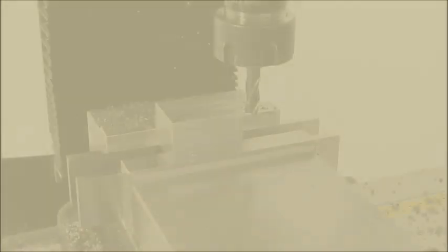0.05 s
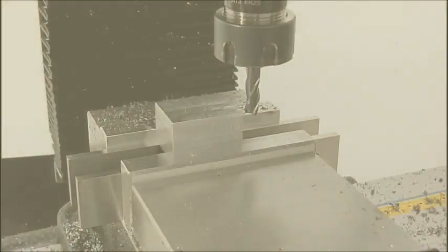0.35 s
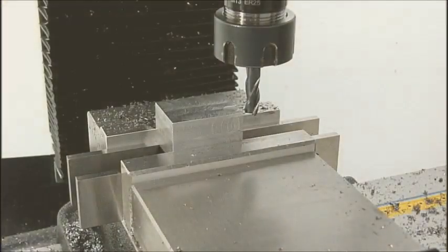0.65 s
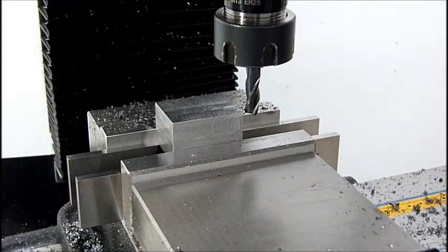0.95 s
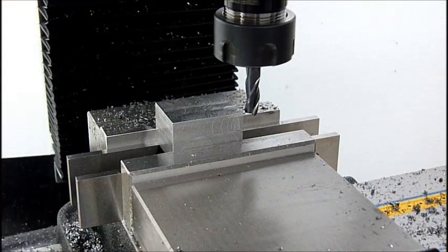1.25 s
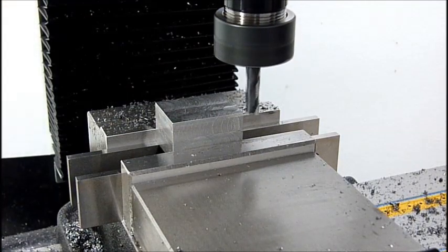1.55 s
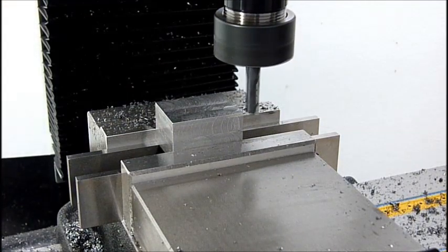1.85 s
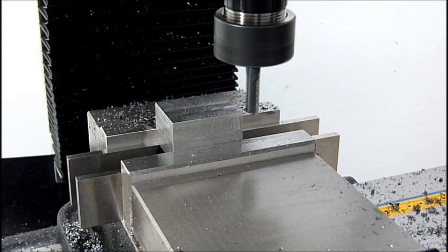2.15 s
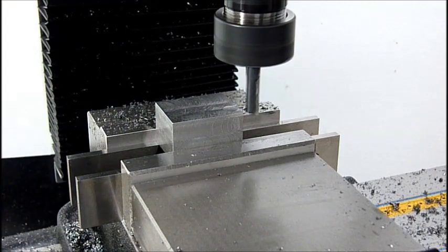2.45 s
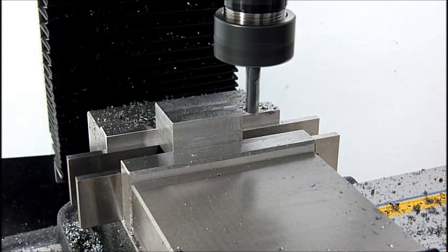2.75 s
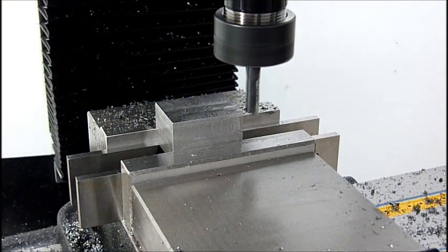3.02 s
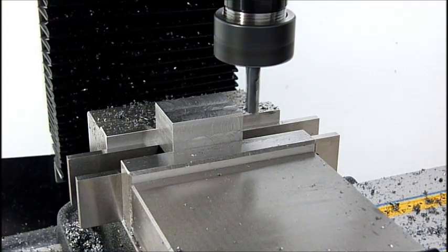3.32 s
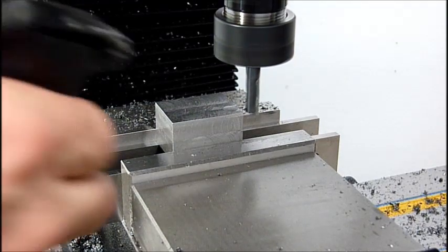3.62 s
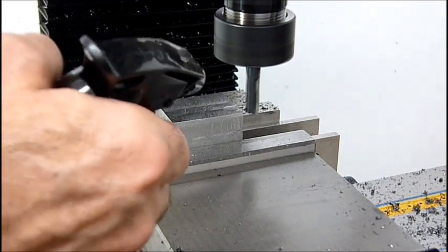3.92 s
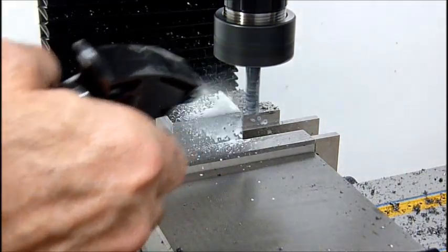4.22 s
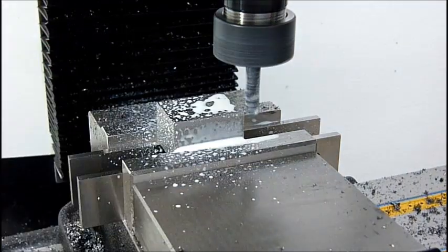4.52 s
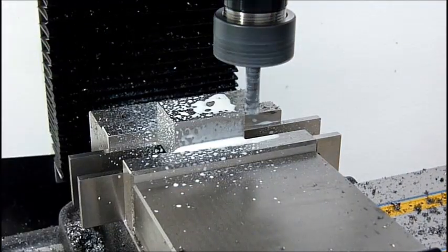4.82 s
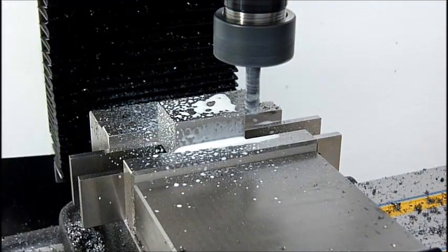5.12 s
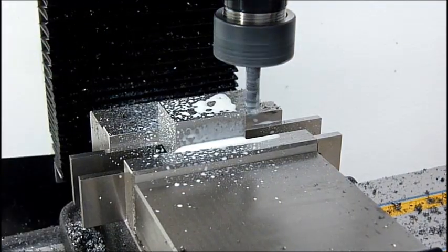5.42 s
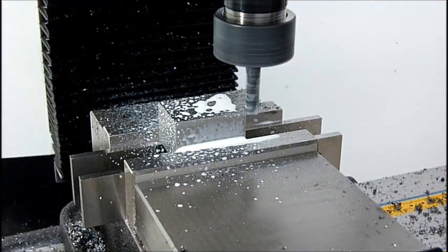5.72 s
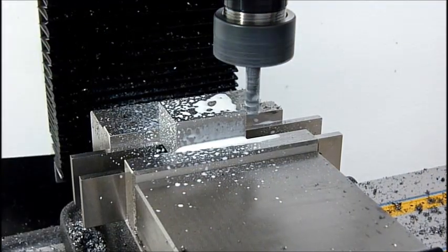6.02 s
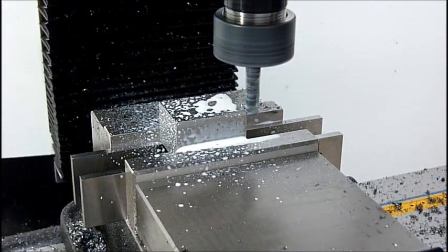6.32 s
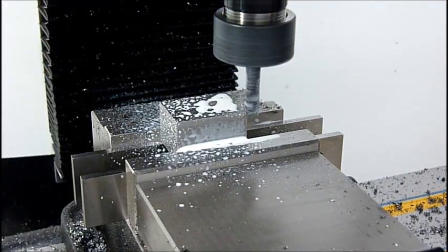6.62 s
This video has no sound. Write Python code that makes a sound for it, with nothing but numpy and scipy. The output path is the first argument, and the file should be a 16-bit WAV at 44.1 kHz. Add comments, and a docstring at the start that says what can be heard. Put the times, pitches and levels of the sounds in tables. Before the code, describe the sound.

In a workshop, a milling machine clunks on and speeds up with rattling, rising gear whine before droning and scraping through steel.

```python
"""The sound of a workshop fades in over a second: steady air noise and a few light clicks.
A milling machine starts with a clunk. As it speeds up, its gear teeth rattle, its head groans under
the strain and its gears whine higher and higher. Just before full speed the sound drops out briefly.
Then the spinning cutter bites into a steel block: the frame drones, the block grinds and the
cutting edges scrape off chips, one edge hardest on each turn."""
import sys
import numpy as np
from scipy import signal
from scipy.fft import rfft, irfft, next_fast_len
from scipy.io import wavfile
from scipy.ndimage import map_coordinates

SR = 44100
rng = np.random.default_rng(int(sys.argv[2]) if len(sys.argv) > 2 else 0)


def int16_out(signal):
    """Quantize to a 16-bit WAV file."""
    q = np.round(np.clip(np.atleast_2d(signal).T, -1, 1) * 32767)
    wavfile.write(sys.argv[1], SR, q.astype(np.int16))


N = 302967

# tone colour of the air noise: f/Hz, level/dB
AIR_COLOUR = [(24, -20), (40, -18), (108, -7.5), (141, -6), (205, -5.5), (244, -3.5), (371, -5), (822, -11),
              (898, -9.5), (980, -12), (7800, -27), (10100, -71.5), (17200, -120)]
# how long the room's echo takes to fall by 60 dB: f/Hz, t/s
ECHO_DECAY = [(200, 0.54), (700, 0.27), (2000, 0.2), (7000, 0.17)]
# light clicks: t/s, level/dB
TICKS = [(0.435, -33), (.439, -35), (0.534, -41.5), (1.0916, -23.5)]
# their tone colour: f/Hz, level/dB
TICK_COLOUR = [(300, -28.5), (900, -7), (1300, 5), (1900, 5), (2700, -8), (3500, -6), (4500, -25),
               (7500, -25)]
# blows of the starter switch: t/s, level/dB
STARTER_BLOWS = [(0.868, -6.5), (0.8742, -7.5), (.879, -1), (0.8837, 2.5), (.887, -4.5), (.894, -9.5)]
# their tone colour: f/Hz, level/dB
CLACK_COLOUR = [(100, -28.5), (230, -8.5), (300, -6.5), (520, 0.5), (850, -7.5), (1250, -8.5), (1600, -16),
                (2400, -23), (4000, -25), (6500, -27.5), (7800, -40.5)]
# ringing notes of the starter's cabinet: f/Hz, level/dB, time to fall by 60 dB/s
CABINET_NOTES = [(280, 0, 0.24), (484, 0, 0.14), (652, -16, 0.29), (734, -9, 0.25), (990, -2, .11),
                 (1300, -12, .12)]
# how fast the machine runs: t/s, share of full speed
SPEED = [(.9, .03), (1.3, .21), (1.65, 0.46), (2.0, 0.64), (2.2, 0.71), (2.65, 0.81), (3.09, .912),
         (3.18, .995), (5.37, 1), (6.87, 0.96)]
# tone colour of the gearbox housing: f/Hz, level/dB
HOUSING_COLOUR = [(60, -21), (150, -9.5), (280, 1), (600, -3), (1100, -0.5), (2000, -0.5), (3200, 1),
                  (4300, -10.5), (5800, -4.5), (7000, -8.5), (7800, -35)]
# its resonances, the pitches it likes to ring at: f/Hz, width/Hz, boost/dB
HOUSING_PEAKS = [(101, 14, 13), (289, 42, 11.5), (382.7, 52, 10), (497.3, 32, 13.5), (573.7, 69, 17),
                 (706.5, 59.4, 16.5), (796, 94, 8), (860, 77.5, 14), (927.6, 53, 11.5), (1055, 116, 11.5),
                 (1238, 113, 10), (1373, 80, 9.5), (1461, 34, 12), (1656, 91, 8.5), (1805, 186, 8.5),
                 (2017, 183, 11), (2360, 19, 5), (2643, 19, 7.5), (3840, 200, 6.5), (4360, 11, 12.5),
                 (4590, 25, 7.5), (4960, 190, 4.5)]
# tone colour of two loose gears: f/Hz, level/dB
GEAR_COLOUR = [(400, -67.5), (800, -23.0), (2100, -30), (3000, -61)]
# resonances of each of them: f/Hz, width/Hz, boost/dB
LARGE_GEAR_PEAKS = [(865, 44, 23), (912.3, 33, 24)]
SMALL_GEAR_PEAKS = [(2012, 130, 27.5)]
# their loudest bursts of chatter: t/s, large gear boost/dB, small gear boost/dB
CHATTER_BURSTS = [(2.425, 16.5, 11.5), (2.486, 11, 6), (2.72, 11, -2), (2.913, 2, 12), (3.257, 3, 14),
                  (3.395, -1, 11), (3.453, 5, 11), (3.698, 14, -16), (3.947, 12.5, -4), (4.017, 9, 6),
                  (4.124, 14, 8), (4.289, 0, 10), (4.853, 17.5, 5), (5.534, 13, 0)]
# tone colour of the groaning head: f/Hz, level/dB
GROAN_COLOUR = [(100, -38), (240, -15), (330, -1.0), (480, -18), (1000, -51)]
# gear and motor tones at full speed: f/Hz, level/dB, flutter/dB
GEAR_TONES = [(355, -62.5, 0.5), (416.7, -49, 1), (598.7, -43.5, 1.2), (697.4, -52.5, 1), (842, -49.5, 10),
              (908, -53, 7.5), (1386, -60, 0), (1690, -63, -5), (1592, -57.5, 2), (1988, -53, 7.5),
              (2230, -57, 6.5), (3157, -58.5, 6), (3770, -61.5, 4.5), (4400, -75.5, -0.5), (4620, -71.5, 1),
              (5140, -64, -0.5)]
# tones of the shaking frame: multiple of the cutter's turning rate, level/dB
DRONE_TONES = [(2, -56.5), (3, -40), (4, -46.5), (5, -43.5), (6, -56), (7, -49), (8, -49), (12, -49),
               (13, -60.5), (20, -60), (22, -50)]
# notes of the shuddering table and vise: f/Hz, level/dB
SHUDDER_NOTES = [(243, -41), (693.9, -54), (1452, -54.5)]
# the leading edge snags as it enters: t/s, boost/dB
SNAGS = [(5.521, 13.5), (5.653, 5), (5.675, 4.5)]
# tone colour of the scraping edges: f/Hz, level/dB
SCRAPE_COLOUR = [(500, -42), (2500, -24.5), (3800, -2.5), (4300, -15.5), (4500, -2), (4700, -3),
                 (5200, 0.5), (5600, -3.5), (6100, -3.5), (6400, -4.5), (6750, -9), (7100, -19.5),
                 (7800, -39.5)]
# resonances of the cutter: f/Hz, width/Hz, boost/dB
CUTTER_PEAKS = [(4490, 70, 5.5), (5130, 130, 3), (5900, 240, 4.5)]
# tone colour of block, vise and table: f/Hz, level/dB
BLOCK_COLOUR = [(60, -20.5), (130, -34), (165, -21), (250, 4.5), (330, -9.5), (600, -17), (1100, 1),
                (2200, -25.5), (3700, -25.5), (4300, -30), (7800, -51)]
# their resonances: f/Hz, width/Hz, boost/dB
BLOCK_PEAKS = [(196.5, 14, 13), (220, 18, -0.5), (379, 18, 8.5), (546, 190, 9.5), (669, 14, 19),
               (740, 15, -5.5), (810, 15, 1.5), (1073, 24, -1), (1460, 51, 12.5), (1690, 14, -1),
               (1803, 85, 15), (2000, 310, 4), (2434, 76, 13), (3053, 21, 18.5), (4000, 110, 10),
               (4523, 138, 4)]
# the block judders in the vise: t/s, boost/dB, half length/s
JUDDERS = [(6.14, 6, 0.016), (6.802, 4, 0.028)]

RATTLE_DB, RATTLE_GROWTH_DB = -35.5, 35  # base level; rise for ten times the speed
SINGS_FROM, SINGS_FULLY = 0.44, 0.6  # the whine fades in between these shares of full speed
WHINE_TORQUE_DB, WHINE_CUT_DB = 8, -5.5  # its change at full pull, and in the full cut
CONTACT_S, SEAT_S, WIDEN_S = 5.46, .09, 0.78  # first touch; time to settle in; time to full width
SPINDLE_HZ, FIRST_BITE_S = 45.43, 5.52  # cutter turns a second; the leading edge's first bite
DRONE_DB, GRIND_DB, SCRAPE_DB = -.3, -35, -44.5  # gains in the full cut
CLOG_TURNS, CLOG_S, CLOG_DB = 3, 6.422, 4.5  # extra thick chips: turns apart, time of one, boost
DROPOUT_START_S, DROPOUT_END_S = 3.087, 3.187


def amp(db):
    """Turn decibels into a number to multiply by."""
    return 10 ** (np.asarray(db) / 20)


def unit(x):
    """Scale x to an average power of 1."""
    return x / np.sqrt(np.mean(x ** 2) + 1e-20)


def along(points, hz):
    """Read between (f/Hz, value) points on a logarithmic pitch scale."""
    freqs, values = np.transpose(points)
    return np.interp(np.log(hz + 1), np.log(freqs + 1), values)


def clock():
    """The time of every sample, in seconds."""
    return np.arange(N) / SR


def wobble(rate):
    """A smooth random curve through `rate` new values a second."""
    return map_coordinates(rng.standard_normal(N // 40), [clock() * rate + 2], mode="wrap")


def bump(s, half_s):
    """A bell-shaped curve of height 1 around the time s."""
    return np.exp(-.5 * ((clock() - s) / half_s) ** 2)


def lift(peaks, hz):
    """The decibels that resonances (f/Hz, width/Hz, boost/dB) add at each frequency."""
    return sum(db / (1 + (2 * (hz - f) / width) ** 2) for f, width, db in peaks)


def body(x, colour, peaks=()):
    """Send x through an object that colours it and rings at its resonances."""
    size = 2 * next_fast_len(N // 2 + SR // 4)
    hz = np.fft.rfftfreq(size, 1 / SR)
    db = along(colour, hz) + lift(peaks, hz)
    # fold the filter so that ringing comes after each knock, never before
    cepstrum = irfft(np.log(amp(db)), size)
    cepstrum[1:size // 2] *= 2
    cepstrum[size // 2 + 1:] = 0
    return irfft(rfft(x, size) * np.exp(rfft(cepstrum)), size)[:N]


def impacts(rate, scatter_db):
    """Tiny knocks of random time and size, about `rate` a second."""
    hit = rng.random(N) < rate / SR
    return unit(hit * rng.choice([-1, 1], N) * amp(scatter_db * rng.standard_normal(N)))


def workshop():
    """Steady air noise, and a faint hum once the machine is switched on."""
    air = unit(body(rng.standard_normal(N), AIR_COLOUR))
    switched_on = np.interp(clock(), [.9, 1.5], [0, 1])
    hum = np.sin(2 * np.pi * 199.2 * clock() + 0.39 * wobble(6.5)) * switched_on
    return amp(-52) * air + amp(-56.5) * hum


def ticks():
    """Light clicks around the machine, each a soft touch and a quick, harder rebound."""
    out = np.zeros(N)
    for s, db in TICKS:
        contact = np.zeros(N)
        contact[round(s * SR)] = amp(-10.5)
        contact[round((s + .0013) * SR)] = 1
        click = body(contact, TICK_COLOUR, peaks=[(1800, 570, 2)])
        out += amp(db + 1) * click / np.abs(click).max()
    return out + amp(-9) * echo(out)


def echo(x):
    """The workshop's echo: high sounds die away first."""
    hz, t, spectrum = signal.stft(rng.standard_normal(SR // 2), SR, nperseg=256)
    decay = amp(-60 * t / along(ECHO_DECAY, hz)[:, None])
    tail = signal.istft(spectrum * decay, SR, nperseg=256)[1]
    return signal.fftconvolve(x, tail / np.linalg.norm(tail))[:N]


def starter():
    """The starter switch slams shut in a few quick blows and makes its cabinet ring."""
    blows, t = np.zeros(N), np.arange(SR // 2) / SR
    for s, db in STARTER_BLOWS:
        blows[round(s * SR)] = amp(db)
    ring = sum(amp(db - 60 * t / decay_s) * np.sin(2 * np.pi * hz * t + rng.uniform(0, 2 * np.pi))
               for hz, db, decay_s in CABINET_NOTES)
    # every blow jangles for a few milliseconds
    jangle = signal.fftconvolve(blows, amp(-60 * t / .012))[:N] * rng.standard_normal(N)
    clack = amp(-50) * unit(body(jangle, CLACK_COLOUR))
    return clack + amp(-3) * echo(clack) + amp(-31.5) * signal.fftconvolve(blows, ring)[:N]


def torque(speed):
    """The motor's pull: hardest from rest, easing to a small idle pull at full speed."""
    return np.clip(1 - speed, 0, 1) + 0.016


def gearbox(speed):
    """Gear teeth knock across the gaps between them, more often with speed, and ring the housing."""
    level_db = RATTLE_DB + RATTLE_GROWTH_DB * np.log10(speed)
    knocks = impacts(900 * speed, scatter_db=2.5) + amp(6.5) * rng.standard_normal(N)
    rattle = amp(-0.5) * unit(body(knocks, HOUSING_COLOUR, HOUSING_PEAKS))
    return (rattle + chatter(speed)) * amp(level_db + .5 * wobble(22))


def groan(speed):
    """The motor's pull makes the machine's head ring low; it swells with speed, then eases off."""
    ring = unit(body(rng.standard_normal(N), GROAN_COLOUR, peaks=[(290.6, 26, 15)]))
    return amp(-25.5) * torque(speed) * speed ** 2.9 * ring


def chatter(speed):
    """Two loose gears chatter in bursts once fast enough, the large one more when the motor pulls."""
    burst_db = sum(np.outer([large_db, small_db], bump(s, 0.011))
                   for s, large_db, small_db in CHATTER_BURSTS)
    gears = []
    for peaks, db in zip([LARGE_GEAR_PEAKS, SMALL_GEAR_PEAKS], burst_db):
        ring = unit(body(rng.standard_normal(N), GEAR_COLOUR, peaks))
        gears.append(ring * amp(db + 3.5 * np.clip(wobble(45), -2, 1.2)))
    large, small = gears
    fast_enough = np.interp(speed, [.3, .58], [0, 1])
    return (amp(-11.5 + 11.5 * torque(speed)) * large + amp(-13) * small) * fast_enough


def whine(speed):
    """Meshing teeth sing tones that rise with speed and swell at the housing's resonances."""
    pull = torque(speed)
    level_db = WHINE_TORQUE_DB * pull + WHINE_CUT_DB * engagement(WIDEN_S)
    grid_hz = np.arange(SR // 4)
    housing_db = lift(HOUSING_PEAKS, grid_hz)
    out = np.zeros(N)
    for hz, db, flutter_db in GEAR_TONES:
        swell_db = np.interp(hz * speed, grid_hz, housing_db) - np.interp(hz, grid_hz, housing_db)
        slow_db = -45 * (1 - speed) * np.abs(np.log2(hz / 520))  # only the main tones sing when slow
        waver = (0.18 * flutter_db + 2.5 * pull) * wobble(16)
        phase = 2 * np.pi * hz * np.cumsum(speed) / SR + waver
        depth_db = flutter_db + 28 * np.clip(1 - speed, 0, .12)  # rougher below full speed
        flutter = amp(depth_db * np.clip(wobble(14), -2, 1.5))
        out += amp(db + 0.75 * swell_db + slow_db) * unit(flutter * np.sin(phase))
    return amp(level_db) * np.interp(speed, [SINGS_FROM, SINGS_FULLY], [0, 1]) * out


def engagement(rise_s):
    """How far the cutter is in: 0 until it touches the block, 1 from rise_s later."""
    return np.clip((clock() - CONTACT_S) / rise_s, 0, 1)


def frame_drone(turns):
    """The cut shakes the frame in step with the turns; table and vise shudder at their own notes."""
    out = np.zeros(N)
    for multiple, db in DRONE_TONES:
        phase = 2 * np.pi * (multiple * turns + rng.random()) + 0.064 * multiple * wobble(12)
        out += amp(db + 2 * wobble(5.2)) * np.sin(phase)
    for hz, db in SHUDDER_NOTES:
        out += amp(db + 3 * wobble(15)) * np.sin(2 * np.pi * hz * clock() + .5 * wobble(8.9))
    return np.sqrt(2) * out


def leading_bite(turns, width):
    """The cutter runs off-centre, so one edge takes the thickest chip, a bit different each turn."""
    clogged = np.round((clock() - CLOG_S) * SPINDLE_HZ) % CLOG_TURNS == 0
    snag_db = sum(db * bump(s, .5 / SPINDLE_HZ) for s, db in SNAGS) + CLOG_DB * width * clogged
    thickness = amp(snag_db + 1.5 * np.clip(wobble(SPINDLE_HZ), -2, 2))
    turns_from_bite = (turns + 0.034 * wobble(SPINDLE_HZ) + .5) % 1 - .5
    return thickness * np.exp(-.5 * (turns_from_bite / 0.11) ** 2)


def cutter():
    """The cutting force repeats every turn: it shakes the frame, grinds steel and scrapes off chips."""
    width = engagement(WIDEN_S)
    turns = (clock() - FIRST_BITE_S) * SPINDLE_HZ
    drone = frame_drone(turns)
    bite = leading_bite(turns, width)
    other_edges = np.interp(width, [0, 1], [.15, .42])  # they join in as the cut widens
    force = (bite + other_edges) * amp(wobble(300))  # the chip tears off in jerks
    scrape = unit(body(force * impacts(6000, scatter_db=2), SCRAPE_COLOUR, CUTTER_PEAKS))
    pressure = (1 + 0.47 * bite) * amp(1.1 * wobble(25))
    grind = unit(body(pressure * impacts(2500, scatter_db=3.5), BLOCK_COLOUR, BLOCK_PEAKS))
    judder_db = sum(db * bump(s, half_s) for s, db, half_s in JUDDERS)
    return (amp(DRONE_DB) * engagement(SEAT_S) * drone
            + amp(GRIND_DB + judder_db) * width ** 0.76 * grind
            + amp(SCRAPE_DB) * width ** 0.57 * (scrape + amp(-5.5) * echo(scrape)))


def scene():
    """The machine in its workshop, heard from close to the vise."""
    speed = np.interp(clock(), *np.transpose(SPEED))
    machine = starter() + ticks() + gearbox(speed) + groan(speed) + whine(speed) + cutter()
    return (machine + workshop())[None]


def low_pass(x, hz):
    """Sharply cut away everything above hz."""
    return signal.sosfilt(signal.ellip(10, .1, 80, hz, fs=SR, output="sos"), x)


def record(dry):
    """The sound loses its top treble, fades in by steps, drops out briefly and later clicks faintly."""
    t = clock()
    offset = -.069  # a steady shift of the wave: it makes the dropout's edges click
    fade = np.minimum(np.round(t * 30) / 30, 1)  # 30 steps in the first second
    sound_on = (t < DROPOUT_START_S) | (t >= DROPOUT_END_S)
    click = amp(-34) * (np.arange(N) == round(4.4225 * SR))
    dulled = low_pass(dry, hz=7900)
    return low_pass((dulled + offset + click) * fade * sound_on, hz=15700)


dry = scene()
out = record(dry)
int16_out(out)
```